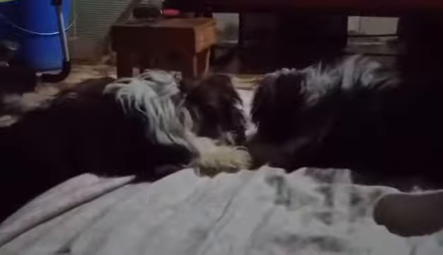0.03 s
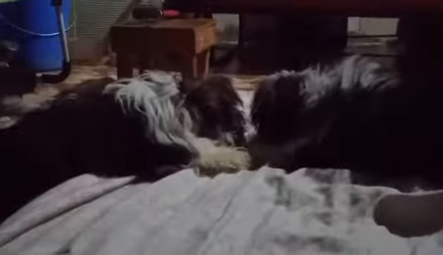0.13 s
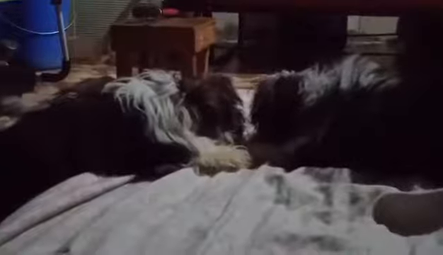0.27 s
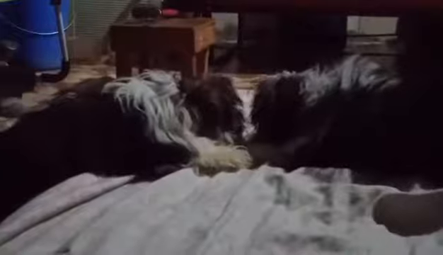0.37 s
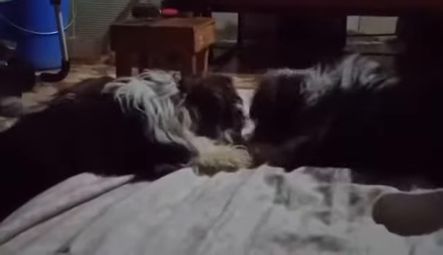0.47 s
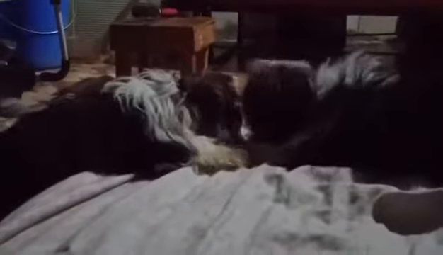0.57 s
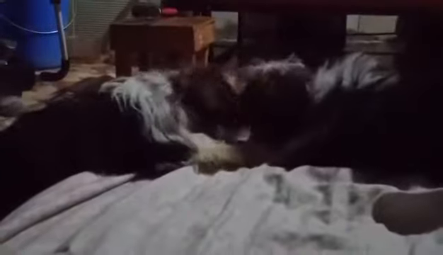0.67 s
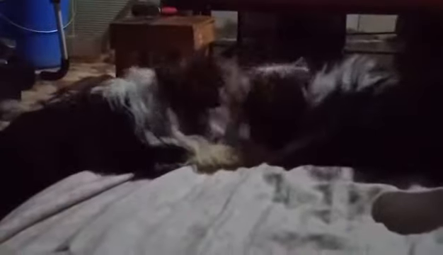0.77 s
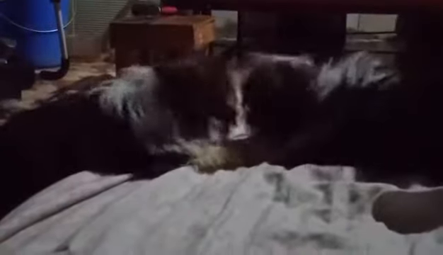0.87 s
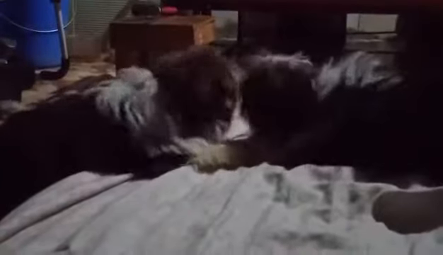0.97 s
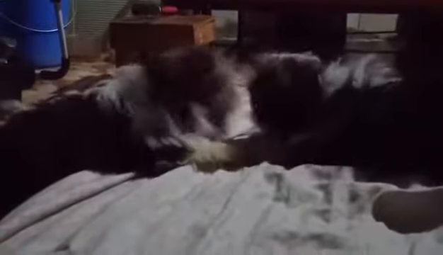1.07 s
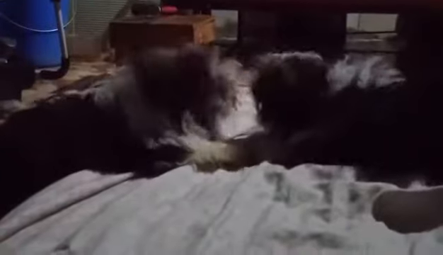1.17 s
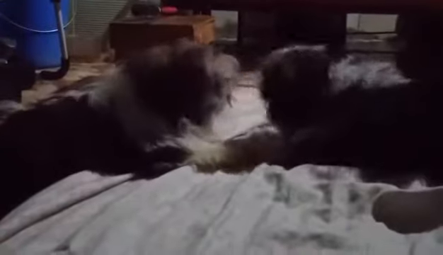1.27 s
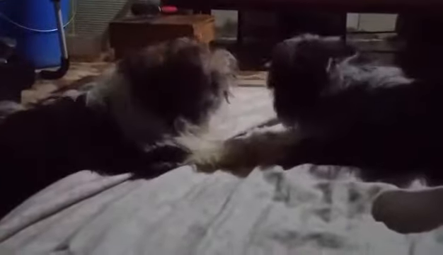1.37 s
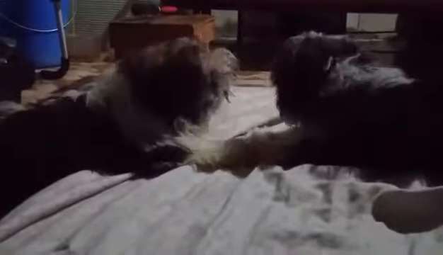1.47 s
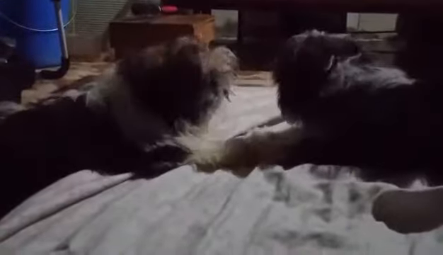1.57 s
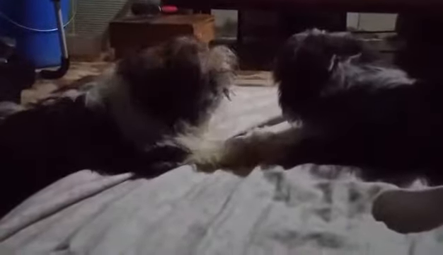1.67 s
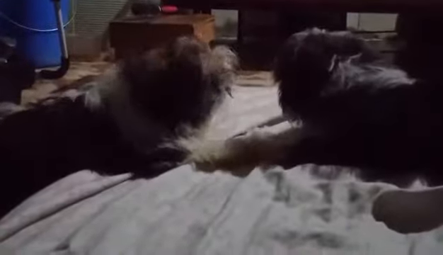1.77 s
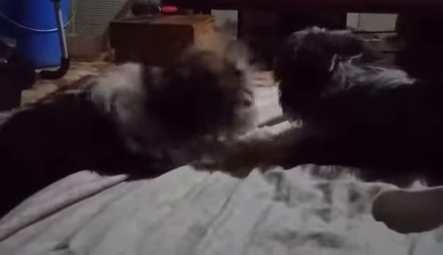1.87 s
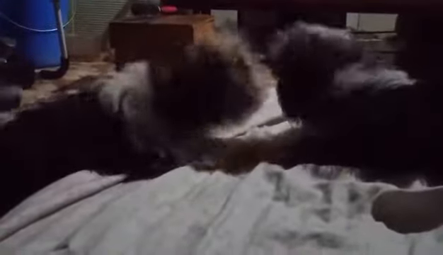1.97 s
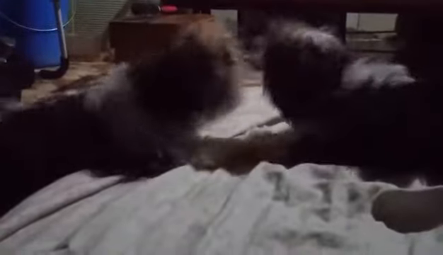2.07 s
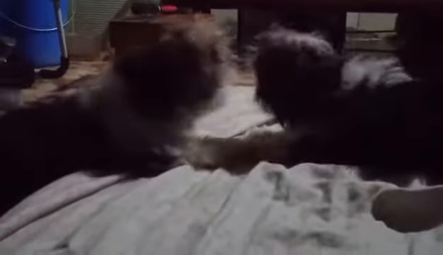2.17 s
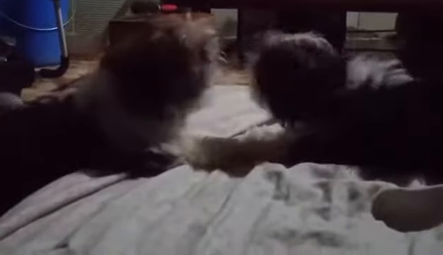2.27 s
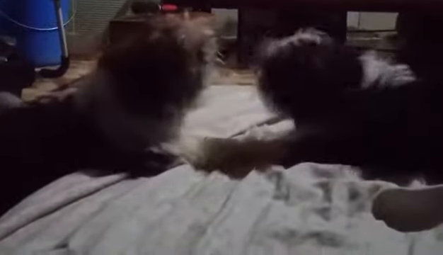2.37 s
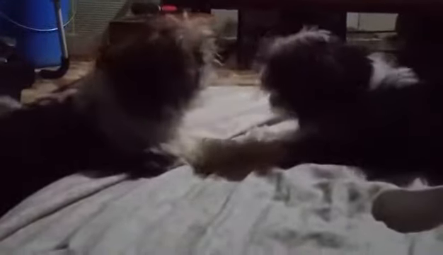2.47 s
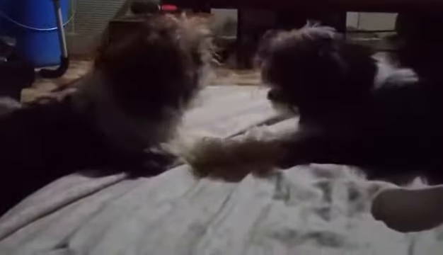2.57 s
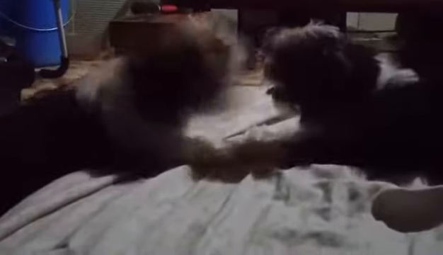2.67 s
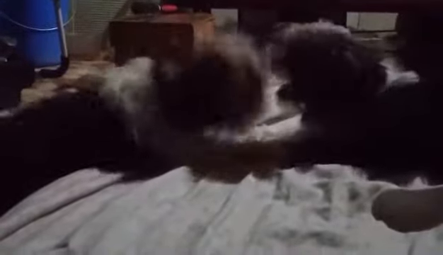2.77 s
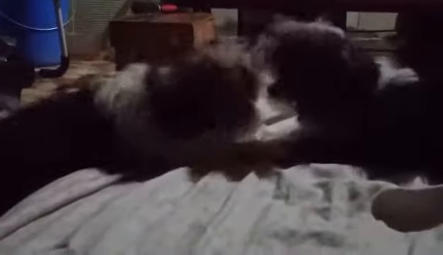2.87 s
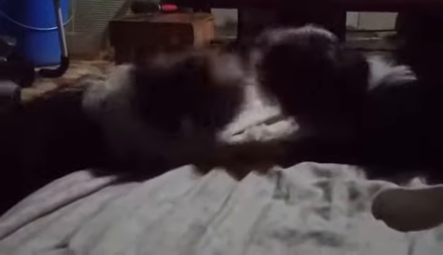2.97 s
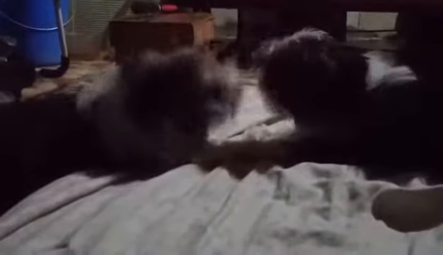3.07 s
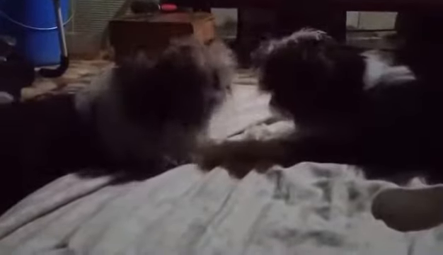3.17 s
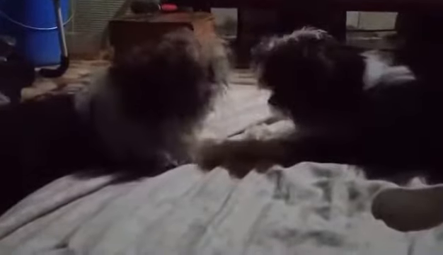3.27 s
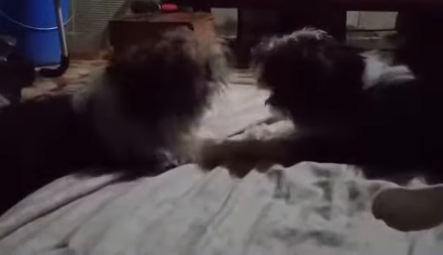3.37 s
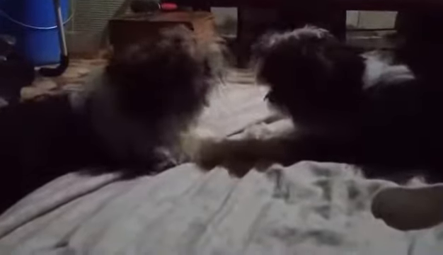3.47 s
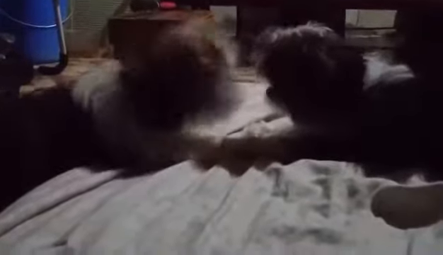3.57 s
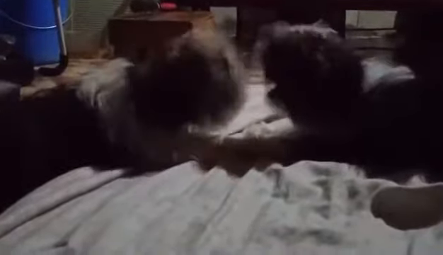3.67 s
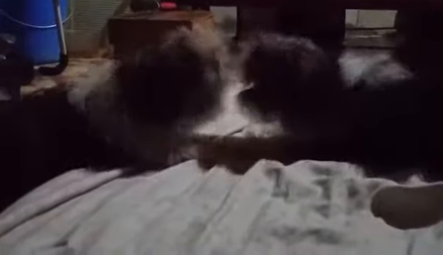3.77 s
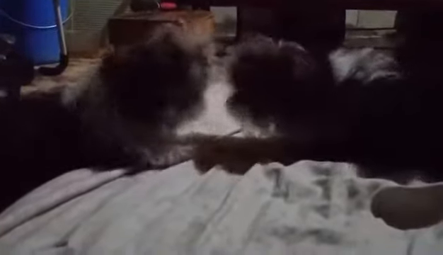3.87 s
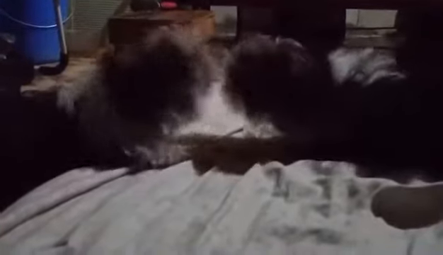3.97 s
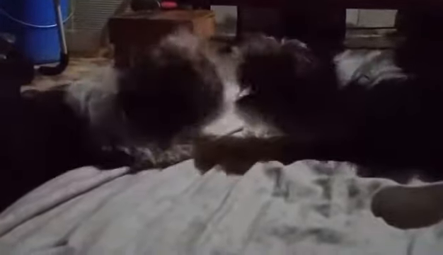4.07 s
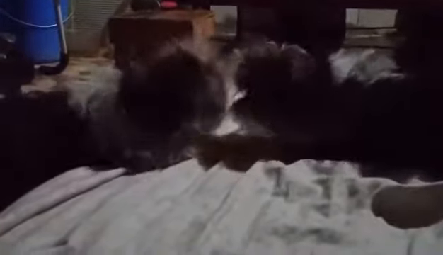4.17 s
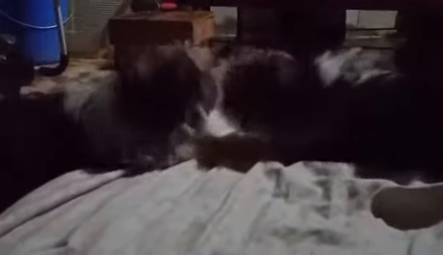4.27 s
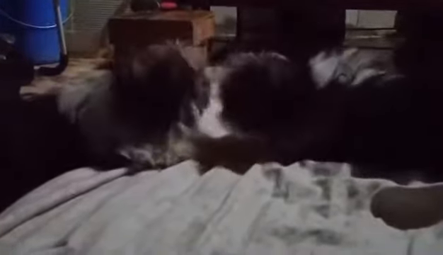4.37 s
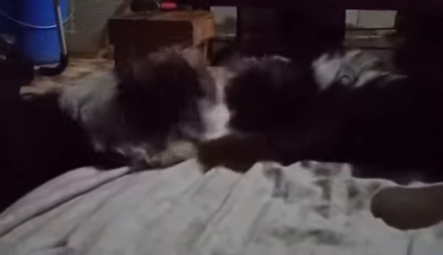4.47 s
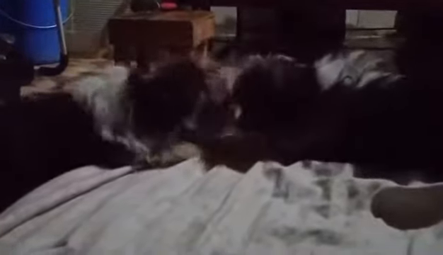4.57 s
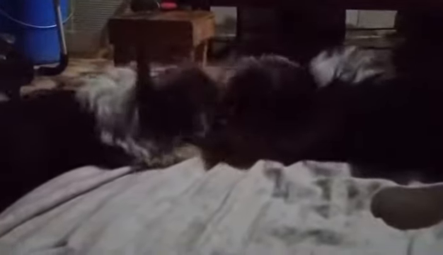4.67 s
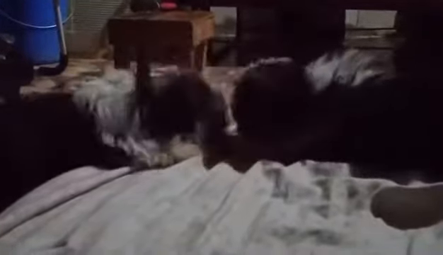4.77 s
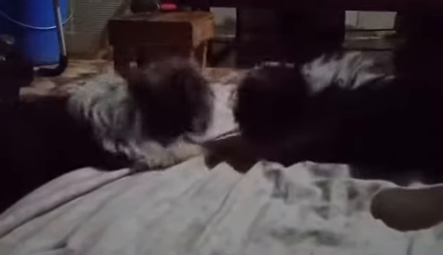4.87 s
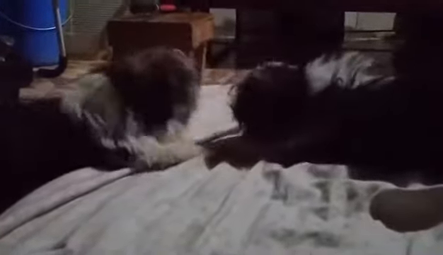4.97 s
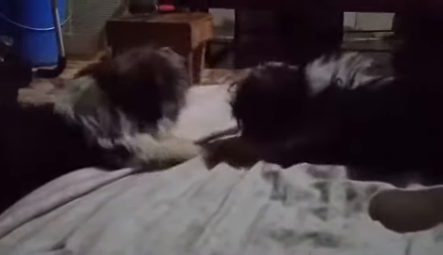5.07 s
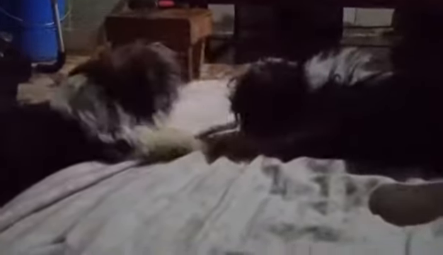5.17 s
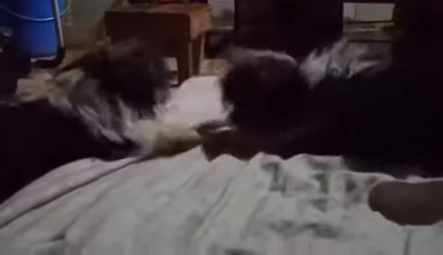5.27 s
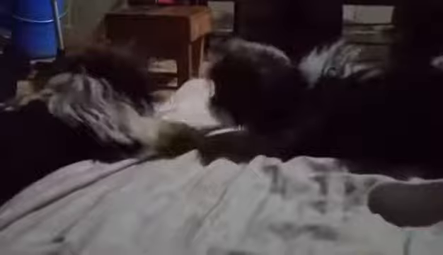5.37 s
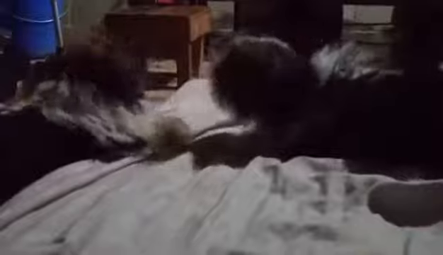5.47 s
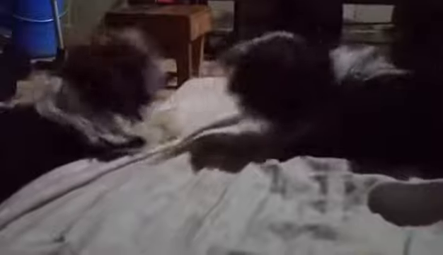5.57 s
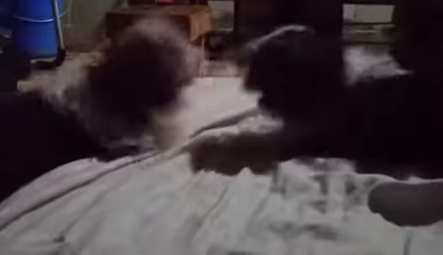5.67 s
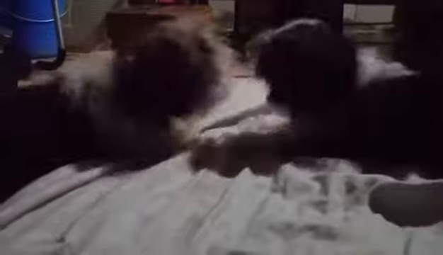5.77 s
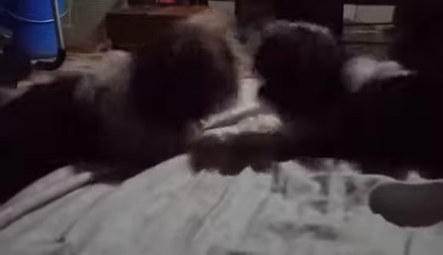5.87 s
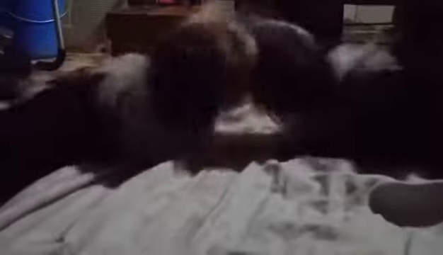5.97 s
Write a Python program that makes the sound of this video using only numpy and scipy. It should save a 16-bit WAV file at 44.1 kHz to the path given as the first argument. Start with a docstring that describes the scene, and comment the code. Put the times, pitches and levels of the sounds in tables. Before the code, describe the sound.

A quiet indoor room with a faint wavering hum. Small dogs give short, breathy, high yips, each rising fast and dropping off, with brief whistling squeaks inside. They start scattered, then bunch into a quick run. Muffled low paw pats on bedding follow, then a shrill yelp and a strong hoarse bark. Close single microphone, short dull room tail.

```python
"""An appliance drones in quiet room air; then two small puppies on a bed bark close by, in a small room.
Voices: fold-pulse harmonics give way to breath noise as they turn hoarse; mouth resonances shape both,
and whistling lines join in. Paws thump the mattress as sagging low pushes;
bedding rustle, dry ticks and room air are shaped noise; the drone is a set of wavering sines."""
import sys
import numpy as np
from scipy import signal
from scipy.fft import rfft, irfft, next_fast_len
from scipy.io import wavfile
from scipy.ndimage import uniform_filter1d, map_coordinates

SR = 44100
rng = np.random.default_rng(int(sys.argv[2]) if len(sys.argv) > 2 else 0)


def waveform_to_disk(signal):
    """Save audio, clipped to [-1, 1], as 16-bit WAV at the path in sys.argv[1]."""
    frames = np.transpose(np.atleast_2d(signal))
    scaled = np.clip(frames, -1, 1) * 32767
    samples = np.round(scaled).astype(np.int16)
    wavfile.write(sys.argv[1], SR, samples)


def level_to_linear(level):
    """Convert decibel levels to linear amplitude factors, elementwise."""
    exponent = np.asarray(level, float) / 20
    return 10 ** exponent


N = 265923


def unit(x):
    """Scaled to rms 1."""
    return x / np.sqrt(np.mean(x ** 2) + 1e-20)


def along(points, hz):
    """(frequency [Hz], value) points read on a log-frequency axis."""
    f, v = np.transpose(points)
    return np.interp(np.log(hz + 1), np.log(f + 1), v)


def wobble(knots_per_s, size):
    """A smooth random curve through normally distributed knots."""
    knots = rng.standard_normal(int(size * knots_per_s / SR) + 4)
    return map_coordinates(knots, [np.arange(size) * knots_per_s / SR])


def filtered(x, response):
    """x times a response of frequency."""
    m = next_fast_len(N + SR // 2)
    return irfft(rfft(x, m) * response(np.fft.rfftfreq(m, 1 / SR)), m)[..., :N]


# vocal folds, one curve a bark: (time [s], pitch [Hz], hoarseness [0-1])
FOLDS = [
    [(.58, 480, 1), (.645, 500, .85), (.67, 585, .55), (.722, 582, .6), (.79, 560, .7)],
    [(.925, 450, .85), (.96, 620, .8), (1.0, 770, .65), (1.015, 760, .3), (1.035, 690, .22),
     (1.055, 560, .3), (1.075, 530, .6), (1.11, 480, .8)],
    [(1.94, 500, .85), (1.97, 720, .7), (2.005, 815, .5), (2.035, 790, .3), (2.06, 750, .25),
     (2.075, 575, .3), (2.12, 480, .75)],
    [(2.738, 370, .1), (2.761, 598, .2), (2.778, 762, .05), (2.798, 810, .3), (2.819, 838, .45),
     (2.855, 792, .7), (2.869, 576, .1), (2.92, 565, .7)],
    [(3.625, 360, .5), (3.65, 616, .3), (3.663, 724, .1), (3.678, 781, .25), (3.705, 806, .5),
     (3.733, 789, .4), (3.79, 634, .8)],
    [(3.89, 920, .03), (3.914, 965, .05), (3.92, 800, .75), (3.96, 760, .7), (3.985, 770, .35),
     (4.0, 770, .25), (4.03, 540, .22), (4.06, 450, .6)],
    [(4.092, 380, .4), (4.121, 676, 0), (4.14, 834, .15), (4.162, 848, .36), (4.192, 809, .77),
     (4.25, 802, .9)],
    [(4.265, 480, .8), (4.305, 510, .45), (4.335, 590, .25), (4.35, 650, .3), (4.362, 725, .22),
     (4.376, 720, .25), (4.388, 600, .12), (4.405, 500, .15), (4.44, 350, .3)],
    [(4.562, 370, .4), (4.59, 660, .12), (4.605, 775, .12), (4.62, 845, .25), (4.645, 850, .4),
     (4.66, 780, .65), (4.71, 700, .8)],
    [(4.72, 470, .6), (4.75, 576, .5), (4.764, 627, .3), (4.778, 647, .1), (4.788, 850, .6),
     (4.86, 838, .8)],
    [(5.29, 950, .8), (5.335, 1150, .6), (5.36, 1190, .4), (5.42, 1230, .42), (5.46, 1250, .55),
     (5.485, 1245, .3), (5.512, 1150, .2), (5.53, 1050, .15), (5.548, 995, .2), (5.59, 960, .6)],
    [(5.722, 1050, 1), (5.77, 1010, .8), (5.79, 974, .75), (5.801, 990, .3), (5.83, 989, .35),
     (5.89, 914, .5)],
]
# mouth at full effort, one row a bark: (settled first resonance [Hz], second early [Hz], second late [Hz],
# second re first [dB], third re first [dB], throat re first [dB])
MOUTHS = [(1940, 3420, 3440, -5, -17, -18.5), (1833, 3310, 3070, -0.5, -12.5, -12),
          (1874, 3740, 3050, -3.5, -17, -19.5), (1772, 3630, 3000, -3, -21, -23.5),
          (1880, 3710, 3120, -4, -21, -19.5), (1908, 3700, 2960, -2.5, -14.5, -14.5),
          (1786, 3400, 2880, -0.5, -20.5, -23), (1910, 3550, 3140, -1, -14, -14),
          (1885, 3700, 2970, -3.5, -18, -25.5), (1805, 3680, 3610, -6, -16.5, -17),
          (2098, 2940, 3390, -7.5, -3.5, -23.5), (2010, 3300, 2800, -6.5, -9, -29)]
# weak extras at full effort, one row a bark: (chest tone [dB], steady high hiss [dB], opening hiss [dB])
EXTRAS = [(-31.5, -47, -62), (-28.5, -46, -61.5), (-36, -50, -29), (-23.5, -47.5, -27), (-23.5, -44, -29),
          (-44, -47.5, -59.5), (-23.5, -45.5, -50.5), (-40, -44, -54.5), (-23, -45.5, -40.5),
          (-37, -44, -55.5), (-24.5, -40, -52), (-41, -47, -45.5)]
# fourth resonance, one value a bark: level re first [dB]
SHOULDER_DB = [-12, -7, -15, -20, -20, -15, -17, -11, -17, -13, -19, -21]


def puppies():
    """Every bark with its own randomly drawn room tail."""
    out = np.zeros(N + SR)
    for folds, shape, extra, shoulder_db in zip(FOLDS, MOUTHS, EXTRAS, SHOULDER_DB):
        start = round(folds[0][0] * SR)
        voice = bark(folds, *shape, *extra, shoulder_db)
        echo = level_to_linear(-7.0) * room(voice)
        out[start:][:len(voice)] += voice
        out[start:][:len(echo)] += echo
    return out[:N]


SOFT_SPAN_DB = 15  # softness runs 0-1 over this span below the bark's peak
# gain at full softness [dB]: (while swelling, while fading)
SECOND_SOFT_DB, THIRD_SOFT_DB, THROAT_SOFT_DB = (1.5, 7), (3, 6.5), (10, 19.5)
HISS_SOFT_DB, CHEST_SOFT_DB = (1, 8.5), (3, 13.5)
DARK_DB, DARK_S = 12, .01  # second to fourth resonances start this much weaker and recover
JAW_HZ, JAW_S = 220, 0.035  # first resonance starts this much higher and settles
CLOSING = (0.13, 0.6)  # part of the bark over which the second resonance slides
CHEST_FADE_DB, CHEST_HOLD_S, CHEST_FADE_S = 18, .062, .028
OPENING_FADE_DB_PER_S = 350


def bark(folds, first_hz, early_hz, late_hz, second_db, third_db, throat_db,
         chest_db, hiss_db, opening_db, shoulder_db):
    """Fold harmonics traded against breath noise, through a mouth that moves with effort and age."""
    s, *curves = np.transpose(folds)
    t = np.arange(s[0], s[-1], 1 / SR)
    age, level_db = t - s[0], effort(t)
    pitch, hoarse = (np.interp(t, s, c) for c in curves)
    soft = np.clip((level_db.max() - level_db) / SOFT_SPAN_DB, 0, 1)
    swelling = t < t[level_db.argmax()]

    def soft_gain(pair):
        return soft * np.where(swelling, *pair)

    dark_db = DARK_DB * np.exp(-age / DARK_S)
    shape = [first_hz + JAW_HZ * np.exp(-age / JAW_S),
             np.interp(age / age[-1], CLOSING, [early_hz, late_hz]),
             second_db + soft_gain(SECOND_SOFT_DB) - dark_db,
             third_db + soft_gain(THIRD_SOFT_DB) - dark_db,
             throat_db + soft_gain(THROAT_SOFT_DB),
             shoulder_db - dark_db]

    # unsteady folds smear the lines
    half_phase = np.pi * np.cumsum(pitch * (1 + .035 * hoarse * wobble(257.2, len(t)))) / SR
    tone, drift = fold_lines(pitch, hoarse, half_phase, shape)
    rasp, hiss = breath(age, hoarse, half_phase, shape)

    chest_fade_db = CHEST_FADE_DB * np.clip((age - CHEST_HOLD_S) / CHEST_FADE_S, 0, 1)
    chest_gain = level_to_linear(chest_db + soft_gain(CHEST_SOFT_DB) - chest_fade_db + drift * 7.6)
    chest = chest_gain * np.sin(2 * half_phase)
    hiss_gain = level_to_linear(hiss_db + soft_gain(HISS_SOFT_DB)) + level_to_linear(opening_db - OPENING_FADE_DB_PER_S * age)
    voice = tone + rasp + chest + hiss_gain * hiss
    edge = np.clip(np.minimum(age, t[-1] - t) / 0.0018, 0, 1)
    return edge * level_to_linear(level_db) * voice + whistle(t, 2 * half_phase)


# breath pushes, some barks have several:
# (start [s], rise [s], time to fall by FALL_DB [s], peak level [dB], rise power [1])
PUSHES = [(0.583, 0.097, 0.08, -17, 2.01), (0.926, 0.063, .07, -19, 1.8), (1.02, .045, .05, -28, 1.1),
          (1.943, 0.083, 0.0756, -12.5, 1.25), (2.74, 0.063, 0.09, -11.5, 1.27),
          (3.629, .05, .08, -14, 1.7), (3.68, .045, .055, -16, 1.1), (3.894, 0.063, 0.0936, -14.5, .7),
          (4.095, 0.067, 0.0841, -12.5, 1.06), (4.265, .04, .07, -16, 1.6), (4.31, .055, .045, -18, 1.1),
          (4.37, .03, .06, -36, 1.1), (4.565, .04, .08, -16, 1.3), (4.61, .055, .04, -17, 1.1),
          (4.72, 0.044, 0.04, -12.5, 1.9), (4.77, 0.037, 0.07, -26.5, 1.2), (5.292, 0.093, 0.02, -16, 1.8),
          (5.395, .03, .09, -17, 1.4), (5.49, 0.05, 0.02, -23.5, 1.2), (5.724, 0.075, 0.08, -11, 1.15)]
FALL_DB, FALL_POWER = 30.5, 1.56


def effort(t):
    """Level in dB: every push rises by a power law and falls ever faster."""
    start, rise, fall, db, power = np.transpose(PUSHES)[:, :, None]
    up = np.clip((t - start) / rise, 0, 1) ** power
    down = level_to_linear(db - FALL_DB * np.clip((t - start - rise) / fall, 0, None) ** FALL_POWER)
    return 20 * np.log10((up * down).sum(0) + 1e-5)


# head and microphone colour of the voices: (frequency [Hz], level [dB])
HEAD = [(500, -53), (900, -21.5), (1100, -4.5), (1400, 10), (2600, -1.5), (4250, -3.5), (4700, -5),
        (5700, -7.5), (6500, -12.5), (7300, -38), (8100, -54.5), (9000, -55.5)]
# half-pitch lines grow with hoarseness up to a ceiling
HALF_DB, HALF_DB_PER_HOARSE, HALF_TOP_DB = -28.5, 50.5, -7.5


def fold_lines(pitch, hoarse, half_phase, shape):
    """Fold pulses as harmonics of half the pitch; also returns the lowest line's drift."""
    size = len(pitch)
    k = np.arange(1, 40)[:, None]
    line_hz = k * pitch / 2
    half_db = np.minimum(HALF_DB + HALF_DB_PER_HOARSE * hoarse, HALF_TOP_DB)
    gain = mouth(line_hz, *shape) * level_to_linear(along(HEAD, line_hz) + half_db * (k % 2))
    # each line swells on its own; high lines lose step first
    drift = hoarse * np.array([wobble(66.4, size) for _ in k])
    blur = hoarse * k * pitch / 2600 * np.array([wobble(150, size) for _ in k])
    clear = np.sqrt(1 - breath_share(line_hz, hoarse))
    lines = gain * clear * level_to_linear(4.2 * drift) * np.sin(k * half_phase + blur)
    return lines.sum(0) / np.sqrt((gain ** 2).sum(0) / 2), drift[0]


def breath_share(hz, hoarse):
    """Share of power that is breath noise; it takes the highs first."""
    return np.clip(hoarse, .01, .99) ** np.clip(2200 / (hz + 1), .45, 2.2)


# high hiss colour: (frequency [Hz], level [dB])
AIRY = [(8000, -27), (10000, -3.5), (11500, 2), (13000, -2.5)]


def breath(age, hoarse, half_phase, shape):
    """Noise puffed at the pitch: a rasp coloured by the mouth, and a high airy hiss at rms 1."""
    size = len(age)
    puffs = rng.standard_normal(size) * (1 + 0.51 * np.cos(2 * half_phase)) * level_to_linear(2.2 * wobble(110, size))
    hz, frame_s, z = signal.stft(unit(puffs), SR, nperseg=256)
    frame_shape = [np.interp(frame_s, age, c) for c in shape]
    colour = mouth(hz[:, None], *frame_shape) * level_to_linear(along(HEAD, hz))[:, None]
    colour = colour / np.sqrt(np.mean(colour ** 2, 0))
    share = breath_share(hz[:, None], np.interp(frame_s, age, hoarse))
    rasp = signal.istft(z * colour * np.sqrt(share), SR, nperseg=256)[1][:size]
    hiss = signal.istft(z * level_to_linear(along(AIRY, hz))[:, None], SR, nperseg=256)[1][:size]
    return rasp, unit(hiss)


def mouth(hz, first_hz, second_hz, second_db, third_db, throat_db, shoulder_db):
    """Throat and four mouth resonances; neighbours one to three oppose in phase and leave valleys."""
    def peak(centre_hz, width_hz):
        return 1j * width_hz * hz / (centre_hz ** 2 - hz ** 2 + 1j * width_hz * hz)

    front = peak(first_hz, 170) - level_to_linear(second_db) * peak(second_hz, 371) + level_to_linear(third_db) * peak(7320, 2000)
    throat = level_to_linear(throat_db) * np.abs(peak(1060, 330)) ** 2
    shoulder = level_to_linear(shoulder_db) * np.abs(peak(3950, 520)) ** 2
    return np.hypot(np.abs(front) ** 1.125, throat + shoulder)


# whistling lines in the barks, from a second vibration in the larynx;
# the one near 3140 Hz is the sum of whistle and fold pitch:
# (start [s], end [s], first frequency [Hz], last frequency [Hz], level [dB])
WHISTLES = [(.63, .667, 1990, 1990, -26), (.98, 1.008, 1950, 1950, -26), (2.02, 2.04, 1850, 1900, -20),
            (2.8, 2.85, 1850, 1820, -21), (3.672, 3.735, 1950, 1900, -22), (3.93, 3.97, 1960, 1950, -23),
            (4.165, 4.2, 1980, 1880, -18), (4.295, 4.315, 1900, 2050, -22), (4.34, 4.376, 1950, 1950, -23),
            (4.645, 4.676, 1970, 1970, -19), (4.786, 4.826, 1700, 1695, -14),
            (5.335, 5.44, 3120, 3160, -33), (5.355, 5.47, 1940, 1990, -25), (5.797, 5.823, 1960, 1960, -13)]
WHISTLE_ON_S, WHISTLE_OFF_S = .006, .0035


def whistle(t, fold_phase):
    """Whistling lines, each with weak overtones and a line at the sum of its own and the fold pitch."""
    out = np.zeros(len(t))
    for start, end, first_hz, last_hz, db in WHISTLES:
        gate = np.clip(np.minimum((t - start) / WHISTLE_ON_S, (end - t) / WHISTLE_OFF_S), 0, 1)
        glide_hz = np.interp(t, [start, end], [first_hz, last_hz])
        phase = 2 * np.pi * np.cumsum(glide_hz) / SR + .3 * wobble(90, len(t))
        swell = level_to_linear(db + 3 + 1.6 * wobble(80, len(t)))
        overtones = 0.065 * np.sin(2 * phase) + 0.03 * np.sin(3 * phase)
        out += gate * swell * (np.sin(phase) + 0.04 * np.sin(phase + fold_phase) + overtones)
    return out


# small room: (frequency [Hz], t60 [s])
ROOM = [(500, 0.24), (2000, 0.15), (6000, 0.2), (12000, 0.12)]


def room(x):
    """A diffuse tail, 200 samples late, in which each frequency dies at its own speed."""
    hz, t, z = signal.stft(rng.standard_normal(SR // 3), SR, nperseg=256)
    tail = signal.istft(z * level_to_linear(-60 * t / along(ROOM, hz)[:, None]), SR, nperseg=256)[1]
    return signal.fftconvolve(np.pad(x, (200, 0)), tail / np.linalg.norm(tail))


# paws on the mattress: (time [s], relative level [dB], starting frequency [Hz])
THUMPS = [(5.151, -38, 209), (5.167, -26.5, 164.4), (5.187, -31, 202), (5.199, -34.5, 305),
          (5.205, -37, 221.4), (5.225, -34, 189), (5.25, -42.5, 220)]
# small clicks among the thumps: (time [s], relative level [dB])
CLAWS = [(5.1919, -43), (5.205, -47)]


def bed():
    """Paw thumps as low pushes that sag in pitch, with short noise clicks among them."""
    out, t = np.zeros(N + SR), np.arange(SR // 8) / SR
    decay_db = -60 * t / 0.017
    for s, db, hz in THUMPS:
        sag = np.sin(2 * np.pi * hz * t * np.exp(-t / 0.026))
        push = sag * level_to_linear(decay_db) * (1 - np.exp(-t / 0.00053))
        out[round(s * SR):][:len(t)] += level_to_linear(db + 8.5) * push
    for s, db in CLAWS:
        dull = np.convolve(rng.standard_normal(len(t)), np.blackman(27) / 4, "same")
        out[round(s * SR):][:len(t)] += level_to_linear(db + decay_db) * dull
    # third-order low cut at 80 Hz
    return filtered(out[:N], lambda hz: (1j * hz / 80) ** 3 / (1 + 1j * hz / 80) ** 3)


# faint dry ticks: (time [s], level before colouring [dB])
TICKS = [(1.2137, -60), (3.205, -61)]
# tick colour: (frequency [Hz], level [dB])
TICK_COLOUR = [(2500, -30), (3400, 22), (4500, 14.5), (5600, 8.5), (7000, -15.0)]


def dry_ticks():
    """Short decaying noise bursts, band-shaped in the treble."""
    out, t = np.zeros(N + SR), np.arange(SR // 8) / SR
    for s, db in TICKS:
        burst = rng.standard_normal(len(t)) * (1 - np.exp(-t / 0.0029))
        out[round(s * SR):][:len(t)] += level_to_linear(db - 60 * t / 0.13) * burst
    return filtered(out[:N], lambda hz: level_to_linear(along(TICK_COLOUR, hz)))


# bedding rustle colour: (frequency [Hz], level [dB per Hz])
RUSTLE = [(3000, -25), (4300, -3), (5800, 0), (7000, -12), (8000, -40)]
RUSTLE_S, RUSTLE_RISE_S, RUSTLE_DB = 5.17, .08, -72


def rustle():
    """A faint treble hiss that swells unevenly once the puppies shift."""
    gate = np.clip((np.arange(N) / SR - RUSTLE_S) / RUSTLE_RISE_S, 0, 1)
    hiss = unit(filtered(rng.standard_normal(N), lambda hz: level_to_linear(along(RUSTLE, hz))))
    return gate * level_to_linear(RUSTLE_DB + 2.5 * wobble(9, N)) * hiss


# appliance tones: (frequency [Hz], relative level [dB])
DRONE = [(344.5, -75), (581.4, -74), (802.1, -66), (1087, -70), (1427, -76.5), (1486, -67.5), (3327, -77)]
# mains hum: (frequency [Hz], relative level [dB])
HUM = (64, -76)


def drone():
    """Appliance tones and mains hum as sines wavering in level and phase."""
    t, out = np.arange(N) / SR, np.zeros(N)
    for hz, db in DRONE + [HUM]:
        waver = level_to_linear(db + 0.5 + 1.2 * wobble(4.6, N))
        out += waver * np.sin(2 * np.pi * hz * t + 0.31 * wobble(5.1, N))
    return out


# room air colour: (frequency [Hz], level [dB per Hz])
AIR = [(15, -45.5), (25, -22), (48, -12.5), (169, -2.5), (203, -6), (411, 0), (481, -5), (901, -7.5),
       (1110, -8.5), (1330, -15), (1440, -13.5), (1560, -16.5), (3420, -18), (5200, -31), (13000, -60.5)]
AIR_RMS_DB = -56.5


def room_air():
    """Coloured noise, slightly patchy in time and frequency."""
    z = signal.stft(rng.standard_normal(N), nperseg=512)[2]
    patches = uniform_filter1d(uniform_filter1d(rng.standard_normal(z.shape), 5, 0), 8, 1)
    air = signal.istft(z * level_to_linear(1.5 * unit(patches)), nperseg=512)[1][:N]
    return level_to_linear(AIR_RMS_DB) * unit(filtered(air, lambda hz: level_to_linear(along(AIR, hz))))


def scene():
    """One microphone, heard on both channels."""
    mono = puppies() + bed() + dry_ticks() + rustle() + drone() + room_air()
    return np.tile(mono, (2, 1))


def low_pass(x):
    """Removes everything above the highest recorded frequency."""
    return signal.sosfilt(signal.butter(12, 13210, fs=SR, output="sos"), x)


# treble difference between channels: (frequency [Hz], level re mid [dB])
SIDE = [(4000, -70), (4500, -5.5), (6000, -5.5), (12000, -5)]


def record(dry):
    """Gain control ducks under loud barks; random phases make the treble differ between the channels."""
    loudness = np.sqrt(np.abs(uniform_filter1d(dry[0] ** 2, 1500)))
    mid = dry[0] * (1 + loudness / level_to_linear(-19)) ** -.5
    hz, _, z = signal.stft(mid, SR, nperseg=512)
    scatter = np.exp(2j * np.pi * rng.random(z.shape)) * level_to_linear(along(SIDE, hz))[:, None]
    side = signal.istft(z * scatter, SR, nperseg=512)[1][:N]
    return low_pass(np.array([mid + side, mid - side]))


dry = scene()
out = record(dry)
waveform_to_disk(out)
```